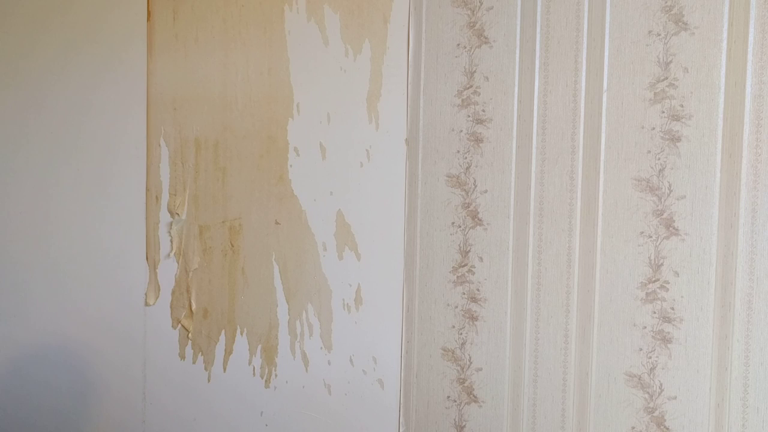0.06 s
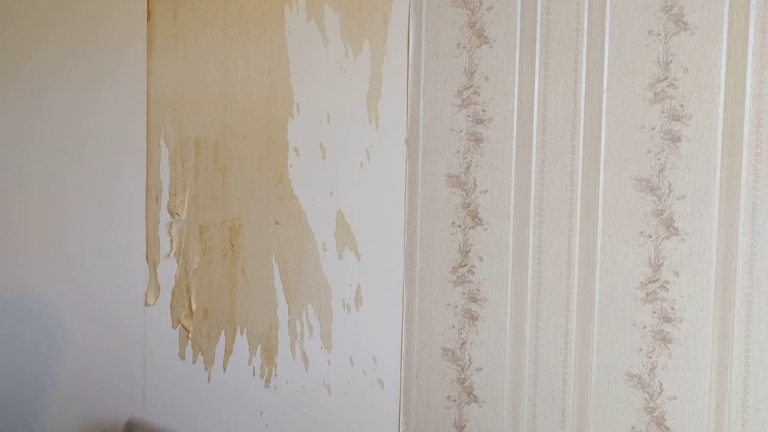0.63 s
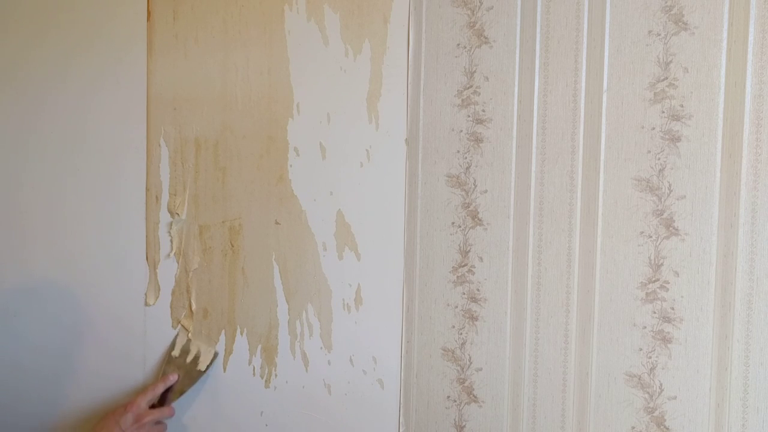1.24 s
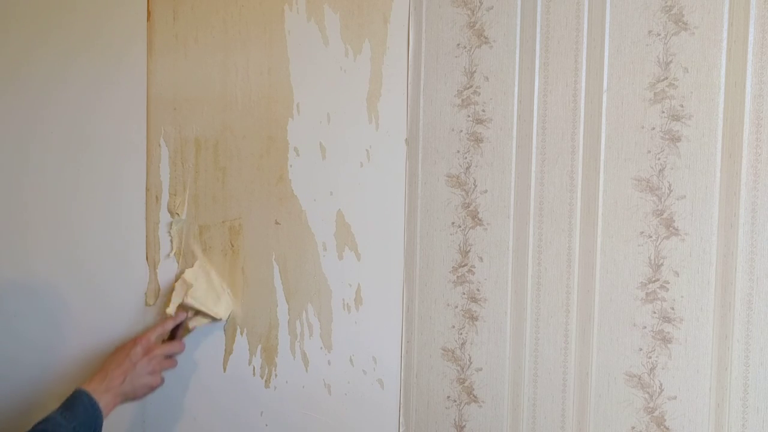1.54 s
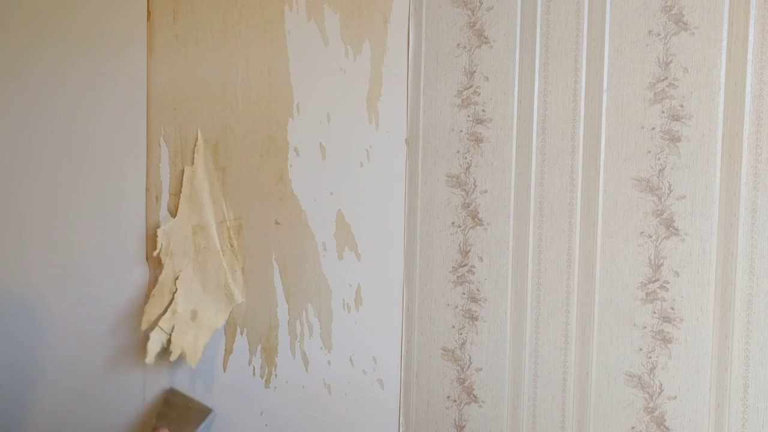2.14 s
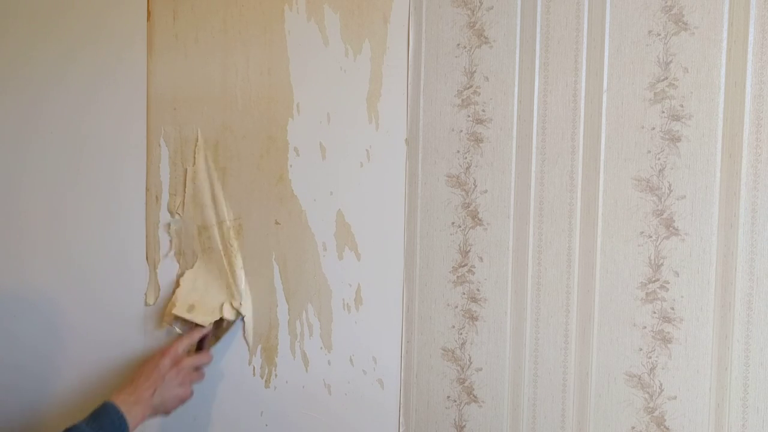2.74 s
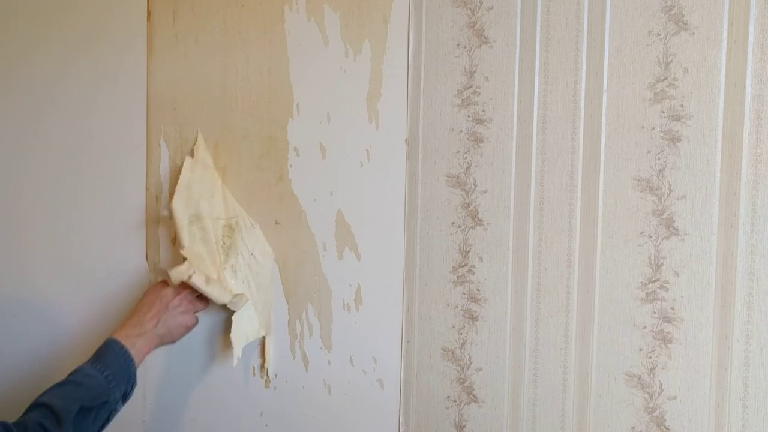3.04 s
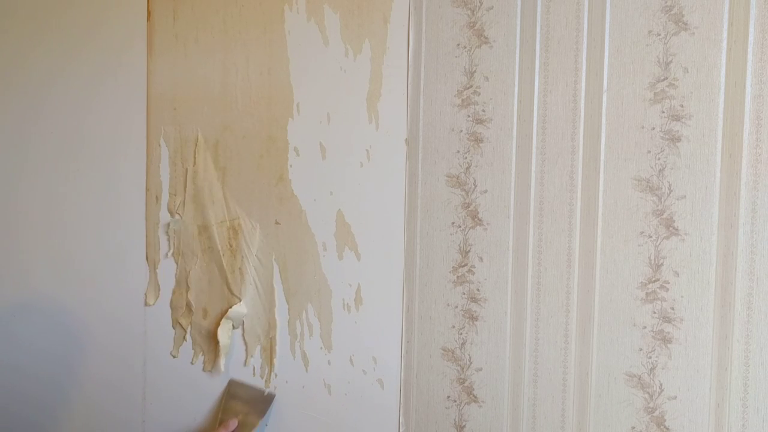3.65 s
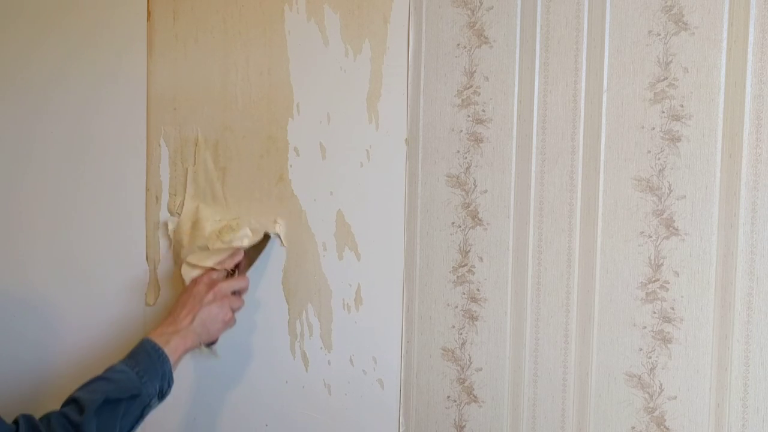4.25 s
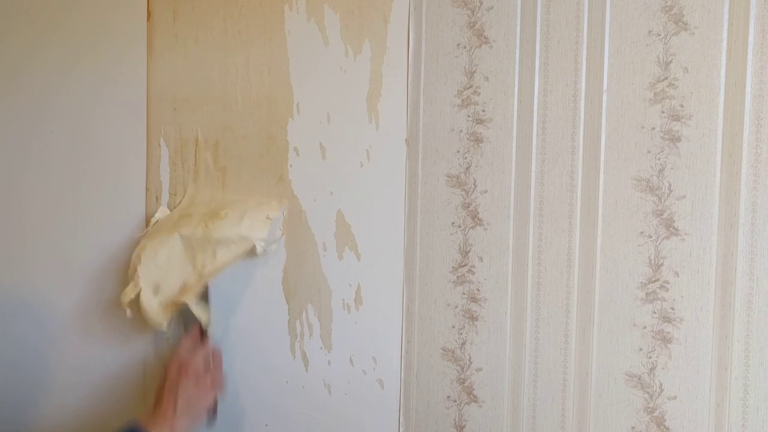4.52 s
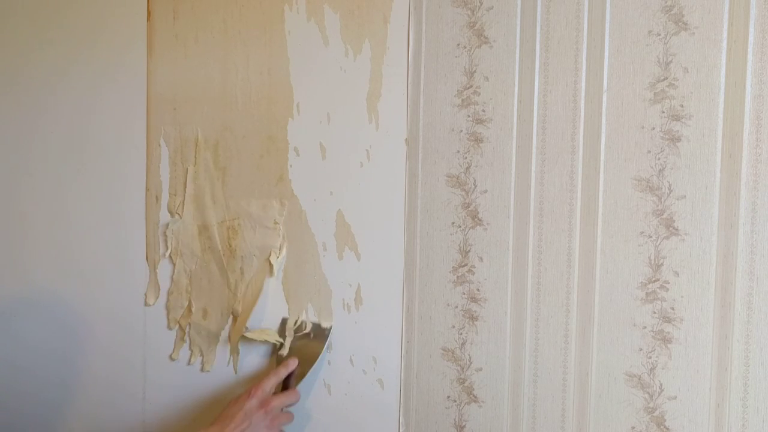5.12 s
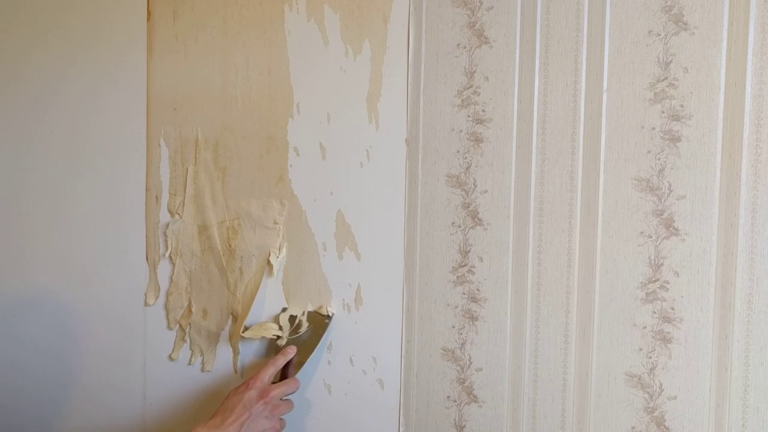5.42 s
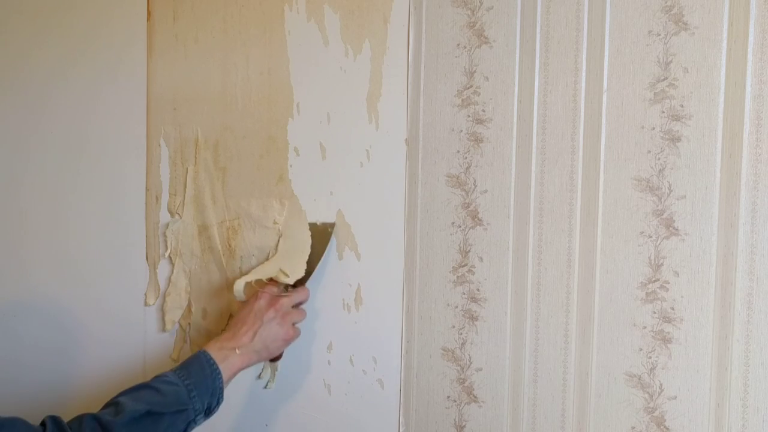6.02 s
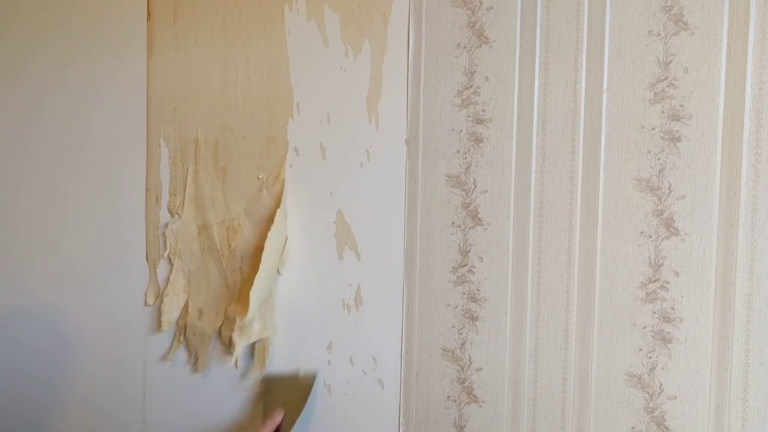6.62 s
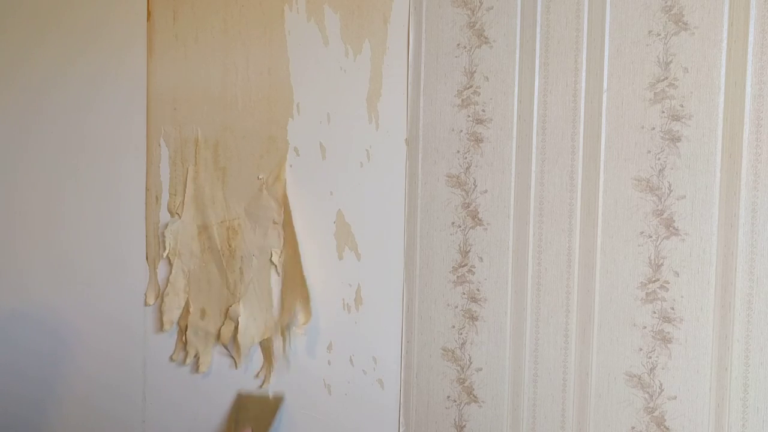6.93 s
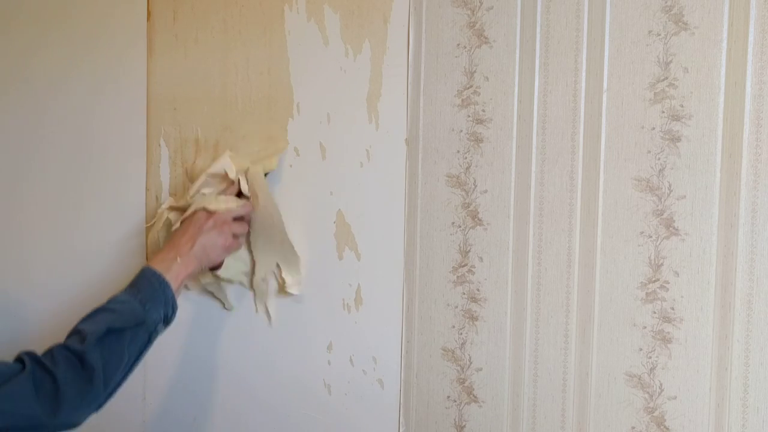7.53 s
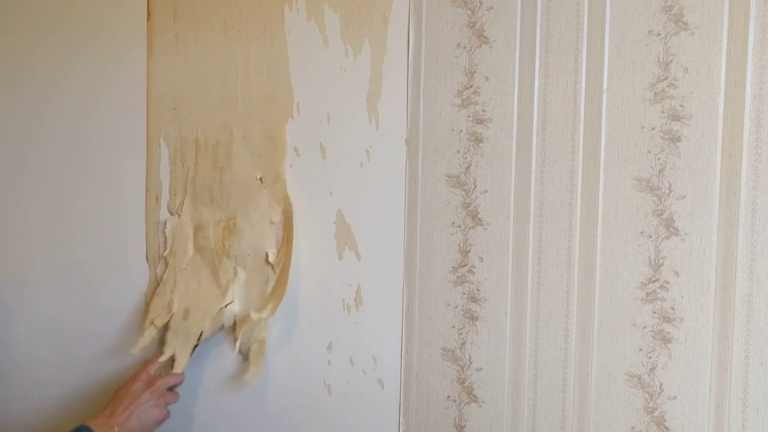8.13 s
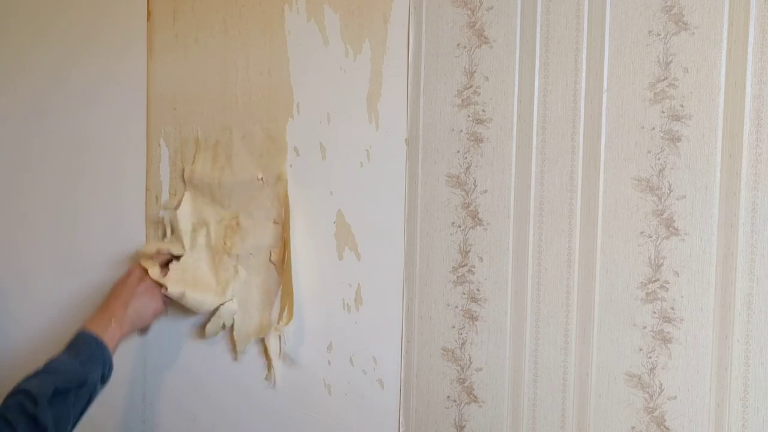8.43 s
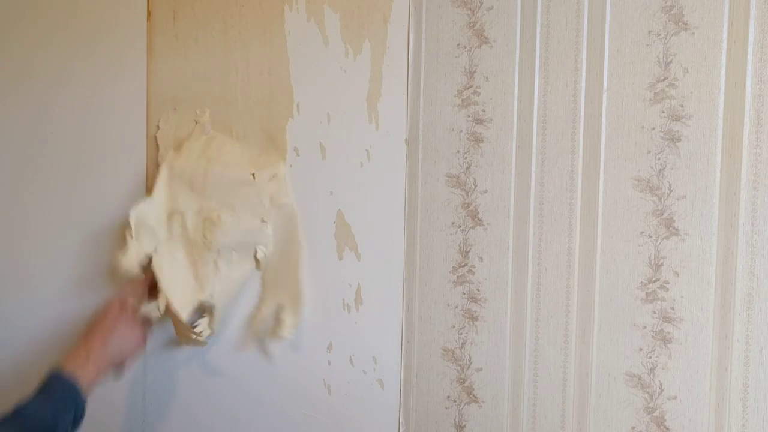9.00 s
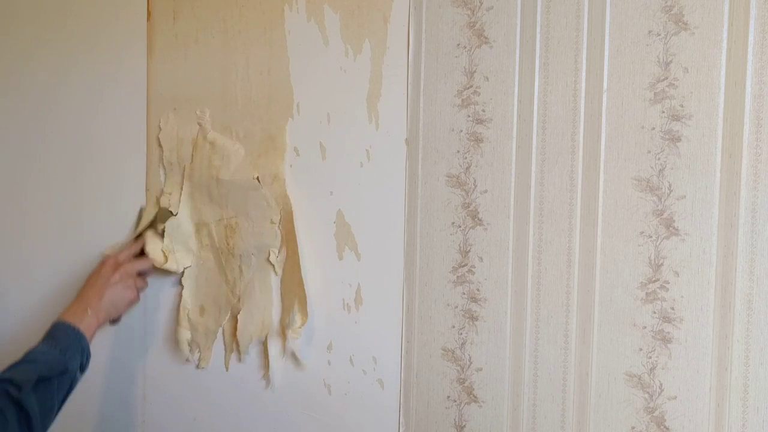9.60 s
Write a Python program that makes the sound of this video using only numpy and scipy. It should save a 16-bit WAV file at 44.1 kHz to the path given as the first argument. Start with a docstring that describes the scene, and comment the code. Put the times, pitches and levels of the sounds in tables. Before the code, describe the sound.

Gritty scraping and paper tearing as a metal blade clacks onto a hollow wall and pushes under wallpaper, stroke after stroke.

```python
"""A bare room, where a steel scraper is pushed up a papered plaster wall in eight strokes.
The blade lands with a clack and rasps by stick-slip friction, at times squealing or chattering.
Paper fibres fracture, the loose sheet flaps and thuds, and the hollow wall drums in its panel modes.
Once a strip zips off; lifted clear, the blade rings in free vibration. Its resonances rise as it
bends, and the near echoes glide as it climbs."""
import sys
import numpy as np
from scipy import signal
from scipy.fft import rfft, irfft
from scipy.io import wavfile
from scipy.ndimage import uniform_filter1d

SR = 44100
rng = np.random.default_rng(int(sys.argv[2]) if len(sys.argv) > 2 else 0)


def output_pcm(signal):
    """Save a mono or channel-first signal as 16-bit PCM at the path in sys.argv[1].

    Samples are clipped to [-1, 1] before scaling.
    """
    pcm = np.clip(np.atleast_2d(signal).T, -1, 1) * 32767
    wavfile.write(sys.argv[1], SR, np.round(pcm).astype(np.int16))


N = 434826
T = np.arange(N) / SR

# Levels and gains in the tables are relative, ahead of filtering and mixing.
# handling of the paper, then the eight strokes: start_s
STROKE_STARTS = np.array([0, .925, 2.286, 3.485, 4.852, 5.52, 6.872, 8.17, 9.271])
# shoves of blade or hand against the paper:
# start_s, rise_s, hold_s, fade_db_per_s, swell_db_per_s, rasp_db, tear_db, rustle_db
SHOVES = [(0, 0.0033, .13, 89, -7, -58, -45, -62), (0.308, 0.06, 0.21, 10, -47, -57, -55.5, -54),
          (.68, 0.31, .02, 60, 0, -56, -63, -68), (0.932, 0.16, 0.48, 80, 0.5, -44, -51, -48),
          (1.38, 0.21, 0.013, 95, 0, -36, -38, -36), (1.576, 0.12, 0.17, 192, 1, -32.5, -42, -44),
          (2.298, 0.037, .015, 90, 0, -37.5, -48.5, -37.5),
          (2.41, .19, 0.42, 148, 3.5, -35.5, -42.5, -46.5), (3.12, 0.1, .01, 258.5, 0, -56, -50.5, -66),
          (3.483, 0.03, .01, 68, 0, -34.5, -50, -36.5), (3.6, .13, 0.39, 40, 1.5, -36, -43.5, -42.5),
          (4.132, .2, 0.027, 113, 0, -35, -35.5, -42), (4.448, 0.042, 0.0075, 173, 0, -37.5, -37, -49),
          (4.858, .015, 0.16, 102, 37, -45.5, -55.5, -49),
          (4.946, 0.16, 0.081, 129, -10, -35.5, -42, -42.5), (5.17, 0.079, 0.011, 196, 0, -43, -42.5, -51),
          (5.512, 0.11, 0.013, 130, 0, -30.5, -39, -48.5), (5.7, 0.097, 0.022, 170, 0, -30.5, -40.5, -58),
          (5.815, 0.046, 0.018, 85, 0, -54, -27.5, -52), (5.91, 0.084, .015, 39, 0, -33.5, -40, -46.5),
          (6.154, 0.084, 0.024, 73, 2, -33, -35.5, -52), (6.866, 0.029, 0.017, 100, 0, -57, -68, -44.5),
          (6.904, 0.076, 0.55, 49, -7, -29, -41, -51.5), (7.308, 0.27, .1, 117, -19, -43, -34.5, -44),
          (7.802, 0.027, 0.22, 111, -28, -70, -61, -65), (8.157, 0.042, 0.43, 87, 4.5, -32.5, -46, -46.5),
          (8.582, 0.12, 0.01, 61, -6, -29, -32.5, -52), (8.897, 0.077, 0.013, 141, 1.5, -45.5, -47.5, -56),
          (9.258, 0.042, 0.53, 114, -6, -30.5, -43, -44)]
# the freed sheet swings out and the wall drums: peak_s, hold_s, sheet_db, wall_db
FLAPS = [(0, 0.035, -43.5, -46.5), (0.476, 0.083, -47, -56), (0.988, 0.022, -41.5, -63),
         (1.84, 0.025, -39, -47.5), (2.293, .02, -56, -50), (2.846, 0.2, -39, -60),
         (4.135, 0.05, -42.5, -39.5), (4.29, 0.11, -39.5, -45), (5.167, 0.074, -35, -41),
         (5.68, 0.16, -50, -53.5), (6.278, 0.029, -32.5, -43.5), (7.455, 0.047, -40, -63),
         (7.613, 0.069, -41, -46), (8.705, .11, -34, -44), (9.783, .07, -42, -62)]
# spectra of rasped plaster, tearing fibres and the fluttering sheet: frequency_hz, gain_db
RASP_SPECTRUM = [(150, -15), (330, -42), (430, -6), (640, -6), (930, -5), (1120, -2.5), (1400, 3.5),
                 (1750, -0.5), (2150, -2.5), (2900, -3.5), (3650, -1.5), (4600, -4.5), (5600, -15),
                 (9000, -42)]
FIBRE_SPECTRUM = [(300, -20), (900, 3.5), (2000, 1), (3600, 4), (5500, 2), (6600, 1.5), (8600, 4.5),
                  (10500, 3), (13000, 1.5), (16000, 2.5)]
SHEET_SPECTRUM = [(40, -31), (100, -8), (170, 0), (240, -4.5), (310, -2), (410, -2.5), (600, -5),
                  (1000, -8), (2500, -25)]
# modes of the blade pressed on the wall: landing_hz, bent_hz, width_hz, gain_db
PRESSED_MODES = [(403, 415, 26, 0.5), (780, 1012, 120, 3), (1140, 1426, 38, 3.5), (1730, 1520, 500, -3),
                 (2470, 2550, 76, -5), (3230, 3610, 360, 0), (4260, 4530, 83, -4.5), (5170, 5570, 56, -11),
                 (6600, 7140, 240, -13), (8670, 8000, 250, -17.5)]
# modes of the wall panel: pitch_hz, width_hz, gain_db
PANEL_MODES = [(54.3, 12, -21), (67.8, 3.5, -10), (97.9, 4.6, 4.5), (142.1, 4.4, -3.5), (177, 36, -14),
               (241, 19.5, -12.5)]
# soft thuds of the hanging sheet: start_s, level_db, pitch_hz
THUDS = [(.005, -39, 57.4), (.012, -37, 230), (0.134, -38, 173), (.508, -34.5, 57.3), (5.224, -30, 238),
         (5.289, -35.5, 128), (6.342, -29.5, 217), (8.695, -33, 235), (8.769, -36, 215), (8.819, -37, 89.5)]
# a faint swish of paper and the strip zipping off, one curve each: time_s, pitch_hz, level_db
ZIPS = [
    [(.02, 3100, -54), (.12, 3420, -45.5), (.2, 3100, -67)],
    [(5.82, 14500, -62), (5.838, 12400, -30), (5.865, 8800, -45), (5.895, 5600, -30.5), (5.925, 3500, -28),
     (5.97, 3480, -32.5), (6.06, 3240, -44)],
]
# a light wipe along the steel before the work: time_s, level_db
WIPE_CURVE = [(.33, -61), (.39, -59), (.55, -55), (.66, -59.5), (.85, -76)]
# modes that the wipe excites: pitch_hz, width_hz, gain_db
WIPE_MODES = [(1360, 250, 0), (1930, 8, 4), (2080, 9.9, 7.5), (3190, 10, 1), (5421, 40, -18),
              (8543, 200, -27), (10487, 180, -28)]
# the blade knocks on the wall: start_s, level_db
KNOCKS = [(0.926, -49.5), (.975, -43.5), (2.282, -44), (2.3, -34), (3.022, -36), (3.478, -45.5),
          (3.488, -34.5), (4.838, -50.5), (4.856, -38.5), (5.519, -46.5), (6.206, -41), (6.442, -34),
          (6.87, -56), (8.163, -43), (8.181, -33), (9.272, -35)]
# modes of blade and plaster in a knock: pitch_hz, width_hz, gain_db
KNOCK_MODES = [(158, 63, 5), (392, 54, 15), (554, 13, 21.5), (757, 21, 16), (1008, 170, 9.5),
               (1490, 20, 13.5), (1615, 42, 12.5), (2440, 80, -24.5), (2660, 31, -20), (3850, 300, -45)]
# the blade squeals as it catches, one curve each: time_s, pitch_hz, level_db
SQUEALS = [
    [(1.08, 780, -53), (1.28, 835, -50.5), (1.48, 1027, -61)],
    [(1, 3350, -54), (1.2, 3550, -55.5), (1.5, 3520, -59)],
    [(2.48, 954, -50.5), (2.68, 1035, -44), (2.82, 1160, -48)],
    [(3.89, 435, -54), (3.955, 450, -43), (4.02, 445, -62)],
    [(5.55, 1660, -45), (5.62, 1745, -39), (5.74, 1760, -51)],
    [(6.97, 825, -60), (7.1, 886, -44), (7.3, 1030, -51)],
    [(7.1, 1600, -57), (7.35, 1365, -36), (7.48, 1340, -63)],
    [(8.17, 1630, -44), (8.3, 1890, -41), (8.7, 2190, -68)],
]
# paper snaps, and ticks of dry flakes: start_s, level_db
SNAPS = [(2.128, -52), (2.8655, -11.5), (5.935, -29), (6.443, -31), (7.33, -37), (7.622, -28),
         (8.695, -12.5), (8.725, -36)]
FLAKE_TICKS = [(3.22, -46), (3.232, -52), (3.337, -63), (6.508, -65), (6.667, -51), (8.88, -35)]
# the blade chatters as it skids free: peak_s, hold_s, fade_db_per_s, level_db
SKIDS = [(2.861, 0.17, 150, -37), (6.216, .01, 69.5, -40)]
# the blade springs clear and rings: start_s, level_db
RINGS = [(3.052, -51), (4.492, -40), (6.444, -63)]
# modes of the free blade: pitch_hz, gain_db, t60_s
FREE_MODES = [(1384, -8, .4), (1497, 0, .95), (2415, -11, .6), (3171, -17, .9), (4780, -18, .3),
              (8215, -24, .27)]
# near reflections during a stroke: delay_ms, drift_ms_per_s, gain
ECHO_PATHS = [(2.2, 0.335, 0.081), (3.4, -0.46, 0.065), (4.6, -1.296, 0.16), (5.6, 1.166, 0.13),
              (8.1, 1.25, 0.1), (11.5, -1.44, 0.09)]
# reverberation time of the room: frequency_hz, t60_s
ROOM_DECAY = [(100, 0.078), (500, 0.48), (1500, 0.55), (5000, 0.39), (15000, 0.24)]
# background noise of the house: frequency_hz, gain_db
QUIET_SPECTRUM = [(15, -5), (25, -2), (53, -1), (120, -1.5), (293, -12), (363, -16), (489, -11),
                  (1480, -20.5), (2550, -21.5), (6050, -24), (6740, -25), (7310, -25), (13600, -24),
                  (16000, -20)]

STROKE_AGE_S = T - STROKE_STARTS[np.searchsorted(STROKE_STARTS, T, "right") - 1]


def amp(db):
    """Amplitude grows tenfold for every 20 decibels."""
    return 10 ** (np.maximum(db, -300) / 20)


def unit(x):
    """Normalisation to an rms of 1."""
    return x / np.sqrt(np.mean(x ** 2) + 1e-20)


def value_at(points, hz):
    """Linear interpolation on a logarithmic frequency axis."""
    frequency, value = np.transpose(points)
    return np.interp(np.log(hz + 1), np.log(frequency + 1), value)


def add(mix, start_s, sound):
    """Superposition: a sound adds to the mix from its start time."""
    part = mix[max(round(start_s * SR), 0):][:len(sound)]
    part += sound[:len(part)]


def power_sum(gains):
    """Incoherent sources add in power."""
    return np.sqrt(sum(gain ** 2 for gain in gains))


def swell(start, rise, hold, fade_db_per_s):
    """An envelope of linear rise, hold at 1 and exponential decay."""
    return np.clip((T - start) / rise, 0, 1) * amp(-fade_db_per_s * np.maximum(T - start - rise - hold, 0))


def colour(x, spectrum, size=4096):
    """Minimum-phase filtering imposes a spectrum, with taps of unit energy."""
    log_gain = np.log(amp(value_at(spectrum, abs(np.fft.fftfreq(size, 1 / SR)))))
    response = np.exp(np.conj(signal.hilbert(log_gain)))
    taps = np.fft.ifft(response).real[:size // 2]
    return signal.oaconvolve(x, taps / np.linalg.norm(taps))[:len(x)]


def resonate(x, hz, width_hz):
    """Forced vibration of a damped oscillator whose natural frequency may vary."""
    turn = np.exp(2j * np.pi * np.cumsum(hz * np.ones(len(x))) / SR)
    pole = np.exp(-np.pi * width_hz / SR)
    return 2 * (turn * signal.lfilter([1 - pole], [1, -pole], x / turn + 1e-18)).real


def body(x, modes):
    """Modal superposition: a body's impulse response is a sum of damped cosines."""
    t = np.arange(SR // 2) / SR
    taps = sum(amp(db) * width * np.exp(-np.pi * width * t) * np.cos(2 * np.pi * hz * t)
               for hz, width, db in modes)
    return signal.oaconvolve(x, taps / np.linalg.norm(taps))[:N]


def glides(curves, drive, width_hz, skirt_hz):
    """Two resonators in cascade narrow the drive to a band that follows each pitch curve."""
    out = np.zeros(N)
    for curve in curves:
        times, hz, db = np.transpose(curve)
        during = (T >= times[0]) & (T <= times[-1])
        pitch = np.interp(T[during], times, hz)
        tone = resonate(resonate(drive[during], pitch, width_hz), pitch, skirt_hz)
        envelope = amp(np.interp(T[during], times, db)) * signal.windows.tukey(len(tone), 0.1)
        out[during] += envelope * unit(tone)
    return out


def wander(hz):
    """Low-pass noise gives a slow random fluctuation of rms 1."""
    rolloff = 1 + (np.fft.rfftfreq(N, 1 / SR) / hz) ** 4
    return unit(irfft(rfft(rng.standard_normal(N)) / rolloff, N))


def slips(per_s, spread_db, clump_db, clump_hz, rubbing):
    """Stick-slip friction as a Poisson train of clicks over smooth rubbing, modulated into clumps."""
    size = amp(spread_db * np.minimum(rng.exponential(1, N), 4))
    clicks = size * rng.choice([-1, 1], N) * (rng.random(N) < per_s / SR)
    friction = unit(clicks) + rubbing * rng.standard_normal(N)
    return unit(friction * amp(clump_db * wander(clump_hz)))


def bursts(events, t60_s):
    """Contact noise decays exponentially after each event."""
    out, t = np.zeros(N), np.arange(SR // 3) / SR
    for start, db in events:
        add(out, start, amp(db - 60 * t / t60_s) * rng.standard_normal(len(t)))
    return out


def shoving(bunching_db_per_s=11, lift_db_per_s2=90):
    """Common excitation: each shove shapes the envelopes of rasp, tearing and rustle together."""
    rasps, tears, rustles = [], [], []
    for start, rise, hold, fade, swell_db_per_s, rasp_db, tear_db, rustle_db in SHOVES:
        held = np.clip(T - start - rise, 0, hold)
        lifted = np.maximum(T - start - rise - hold, 0)
        # the hand draws away ever faster, so the fade steepens
        shove = swell(start, rise, hold, fade) * amp(swell_db_per_s * held - lift_db_per_s2 * lifted ** 2)
        rasps.append(shove * amp(rasp_db))
        tears.append(shove * amp(tear_db + bunching_db_per_s * held))  # paper bunches ahead of the blade
        rustles.append(shove * amp(rustle_db))
    return power_sum(rasps), power_sum(tears), power_sum(rustles)


def shaking(rustle, flap_rise_s=0.052, drum_rise_s=0.13, drum_lag_s=0.068):
    """Mechanical coupling: flaps, rustle and knocks set the envelopes of both sheet and wall."""
    jolt = power_sum(amp(db) * swell(start, rise=0.0099, hold=0.018, fade_db_per_s=139)
                     for start, db in KNOCKS)
    flaps, drums = [], []
    for peak, hold, sheet_db, wall_db in FLAPS:
        flaps.append(amp(sheet_db) * swell(peak - flap_rise_s, flap_rise_s, hold, fade_db_per_s=124))
        drum_start = peak + drum_lag_s - drum_rise_s
        drums.append(amp(wall_db) * swell(drum_start, drum_rise_s, hold, fade_db_per_s=83))
    flap = power_sum(flaps + [rustle, amp(-8.5) * jolt])
    push = power_sum(drums + [amp(-16) * rustle, amp(-14) * jolt])
    return flap, push


def rasping(envelope, bend_s=0.31):
    """Stick-slip on plaster gives gritty noise and drives the blade's modes, which shift as it bends."""
    grit = colour(slips(per_s=2600, spread_db=0.5, clump_db=0.74, clump_hz=130, rubbing=0.56),
                  RASP_SPECTRUM)
    drive = slips(per_s=1800, spread_db=0, clump_db=-3, clump_hz=109, rubbing=0.46)
    bend = 1 - np.exp(-STROKE_AGE_S / bend_s)
    blade = sum(amp(db) * resonate(drive, landing + (bent - landing) * bend, width)
                for landing, bent, width, db in PRESSED_MODES)
    return envelope * (amp(-4) * grit + amp(-6) * unit(blade))


def tearing(envelope, bounce_s=0.000686):
    """Fracture of many paper fibres ahead of the blade merges into a broadband hiss."""
    fractures = slips(per_s=3800, spread_db=2, clump_db=0.2, clump_hz=110, rubbing=0.59)
    fibres = envelope * colour(fractures, FIBRE_SPECTRUM)
    fibres += 0.11 * np.interp(T - bounce_s, T, fibres)  # a bounce off the blade ripples the treble
    fizz = signal.sosfilt(signal.butter(1, 8000, "highpass", fs=SR, output="sos"), fibres)
    return fibres + 0.36 * wander(hz=8.5) * fizz  # drier and softer patches make the fizz come and go


def fluttering(envelope):
    """The freed sheet radiates low-pitched noise as it flutters."""
    crinkles = slips(per_s=700, spread_db=1, clump_db=1, clump_hz=33.8, rubbing=0.31)
    return envelope * colour(crinkles, SHEET_SPECTRUM)


def drumming(push):
    """Forced vibration of the hollow wall's panel modes, as even as the arm's push."""
    drum = body(rng.standard_normal(N), PANEL_MODES)
    running_rms = np.sqrt(uniform_filter1d(drum ** 2, size=3000) + 1e-6)
    return push * drum / running_rms


def thudding(rise_s=0.001, t60_s=0.21):
    """Each thud of the hanging sheet is one damped low oscillation."""
    out, t = np.zeros(N), np.arange(SR // 3) / SR
    envelope = (1 - np.exp(-t / rise_s)) * amp(-60 * t / t60_s)
    for start, db, hz in THUDS:
        add(out, start, amp(db) * envelope * np.sin(2 * np.pi * hz * t))
    return out


def zipping():
    """Fibre snaps form a band of hiss, which sweeps downward as a strip lets go fast and slows."""
    fractures = slips(per_s=3000, spread_db=4.5, clump_db=-0.5, clump_hz=150, rubbing=0.25)
    return glides(ZIPS, fractures, width_hz=970, skirt_hz=7000)


def wiping(friction):
    """Light friction along the steel excites its modes, and the blade sings."""
    times, db = np.transpose(WIPE_CURVE)
    during = (T >= times[0]) & (T <= times[-1])
    return during * amp(np.interp(T, times, db)) * body(friction, WIPE_MODES)


def knocking(strike_db=17):
    """Impact excitation: one hard contact and a short rattle ring the modes of blade and plaster."""
    strikes = np.zeros(N)
    for start, db in KNOCKS:
        add(strikes, start, [amp(db + strike_db)])
    rattle = amp(5) * bursts(KNOCKS, t60_s=0.13)
    return body(strikes + rattle, KNOCK_MODES)


def squealing(friction):
    """As the blade catches, stick-slip drives a narrow, gliding resonance."""
    return glides(SQUEALS, friction, width_hz=50, skirt_hz=260)


def snapping():
    """Sudden fracture of paper gives a broadband crack with a slightly longer hiss of fibres."""
    crack = colour(bursts(SNAPS, t60_s=0.0044), RASP_SPECTRUM)
    hiss = colour(bursts(SNAPS, t60_s=0.0089), FIBRE_SPECTRUM)
    return crack + amp(-10.5) * hiss


def chattering(friction, rise_s=0.015):
    """Skidding free, the blade is forced to vibrate in its lowest modes."""
    skid = power_sum(amp(db) * swell(peak - rise_s, rise_s, hold, fade) for peak, hold, fade, db in SKIDS)
    lowest_mode = resonate(friction, hz=1370, width_hz=350)
    return skid * unit(resonate(lowest_mode, hz=1440, width_hz=820))


def ringing():
    """Free vibration: once the blade is lifted clear, each mode decays at its own rate."""
    out, t = np.zeros(N), np.arange(SR) / SR
    ring = sum(amp(db - 60 * t / t60) * np.sin(2 * np.pi * hz * t) for hz, db, t60 in FREE_MODES)
    for start, db in RINGS:
        add(out, start, amp(db) * ring)
    return out


def ticking():
    """Small sources radiate bass poorly, so dry flakes of paper tick in the treble."""
    return np.diff(colour(bursts(FLAKE_TICKS, t60_s=0.03), FIBRE_SPECTRUM), prepend=0)


def reflections(x):
    """Comb filtering glides as paths by floor, ceiling and side wall change with the blade's climb."""
    echoes = sum(gain * np.interp(T - (delay_ms + drift * STROKE_AGE_S) / 1000, T, x)
                 for delay_ms, drift, gain in ECHO_PATHS)
    return (x + echoes) / np.sqrt(1 + sum(gain ** 2 for _, _, gain in ECHO_PATHS))


def reverberation(x, gap_s=0.00516, patterns=3):
    """A diffuse field decays at its own rate in each band."""
    out = np.zeros(N)
    for k in range(patterns):
        noise = rng.standard_normal(SR) * (T[:SR] > gap_s)
        hz, t, bands = signal.stft(noise, SR, nperseg=256)
        tail = signal.istft(bands * amp(-60 * t / value_at(ROOM_DECAY, hz)[:, None]), SR)[1]
        # the moving hand passes from one echo pattern to the next
        share = np.cos(np.pi * (STROKE_AGE_S / 0.79 + k / patterns)) * np.sqrt(2 / patterns)
        out += signal.oaconvolve(x * share, tail / np.linalg.norm(tail))[:N]
    return out


def scene():
    """Superposition of the work, its echoes and the quiet of the house at one microphone."""
    rasp, tear, rustle = shoving()
    flap, push = shaking(rustle)
    scrape = rasping(rasp) + amp(2) * tearing(tear) + amp(-3) * fluttering(flap)
    paper = thudding() + zipping() + snapping() + ticking()
    friction = slips(per_s=700, spread_db=6, clump_db=-0.6, clump_hz=50, rubbing=0.073)
    steel = wiping(friction) + knocking() + squealing(friction) + amp(1.5) * chattering(friction)
    near = reflections(scrape + paper + steel)
    quiet = amp(-60) * colour(rng.standard_normal(N), QUIET_SPECTRUM)
    mono = amp(-1) * near + amp(-10) * reverberation(near) + amp(0.5) * drumming(push) + ringing() + quiet
    return np.array([mono, mono])


def record(dry, bass_hz=46, edge_hz=15900):
    """Band limiting: the bass rolls off and the highest treble is cut steeply."""
    thin = signal.sosfilt(signal.butter(4, bass_hz, "highpass", fs=SR, output="sos"), dry)
    lowpass = signal.firwin(511, edge_hz, window=("kaiser", 9), fs=SR)
    return signal.oaconvolve(thin, lowpass[None], "same")


dry = scene()
out = record(dry)
output_pcm(out)
```